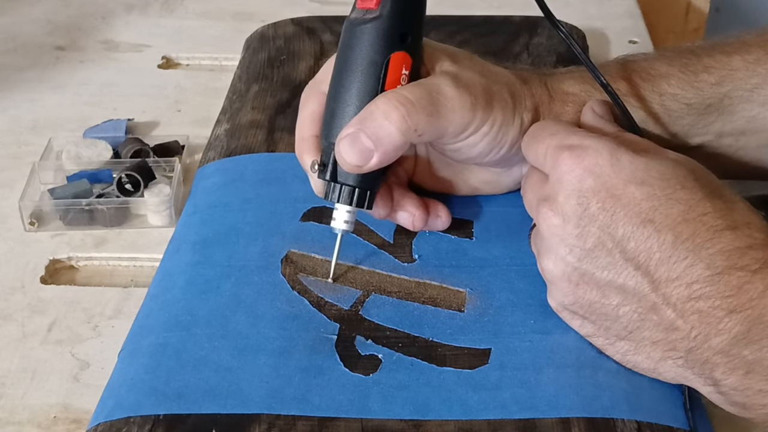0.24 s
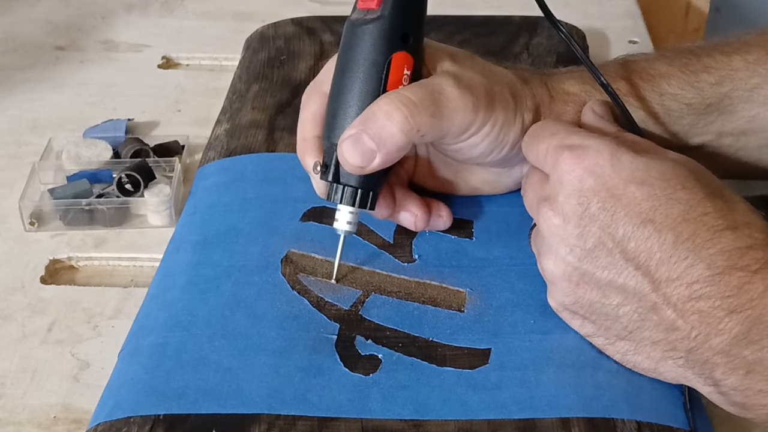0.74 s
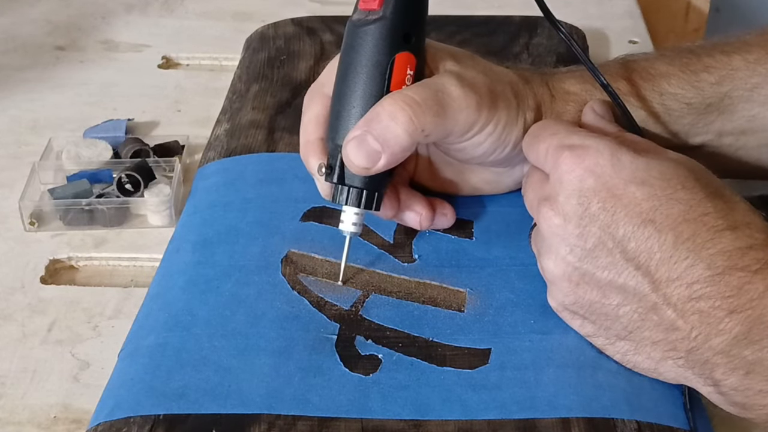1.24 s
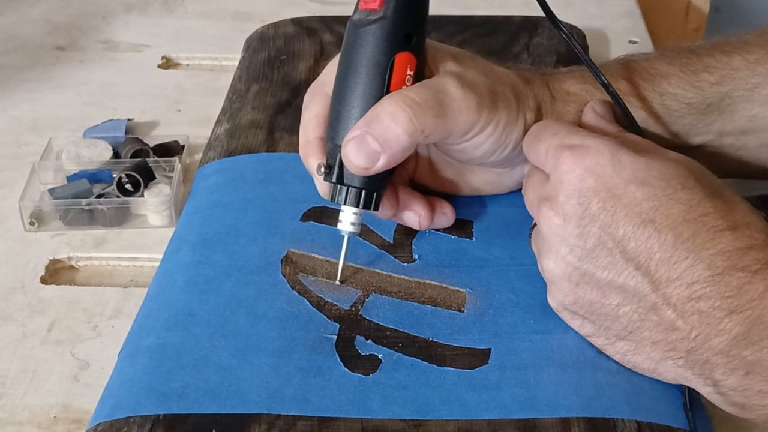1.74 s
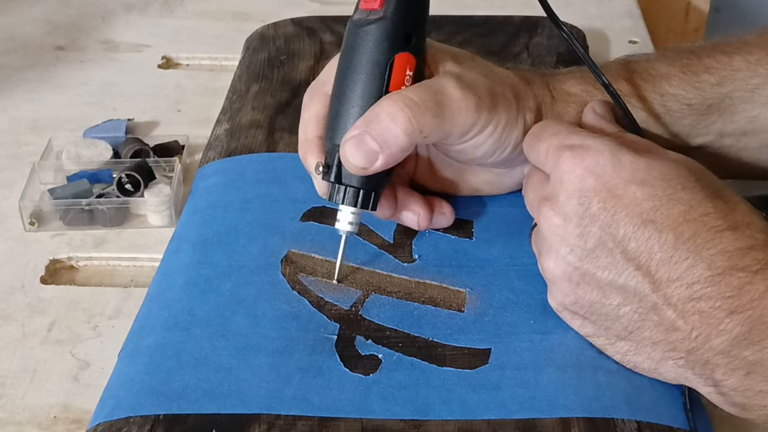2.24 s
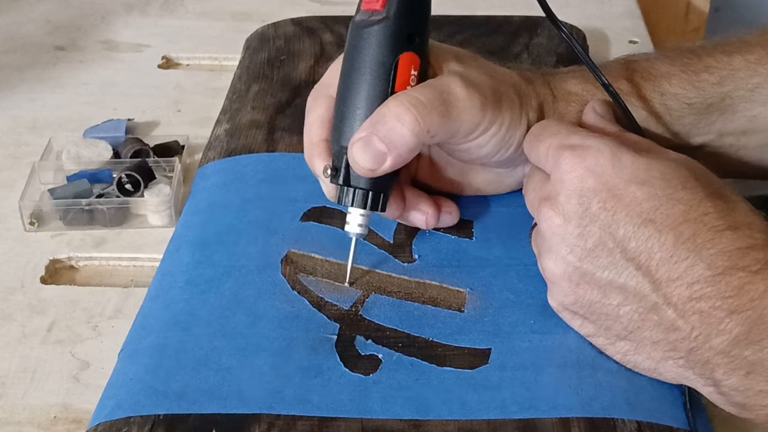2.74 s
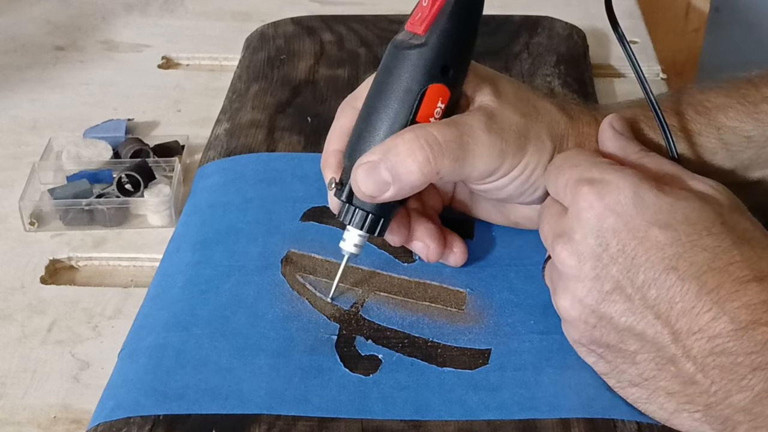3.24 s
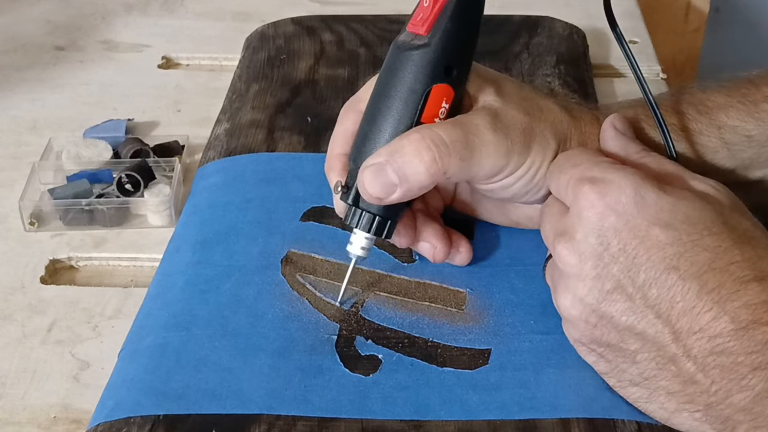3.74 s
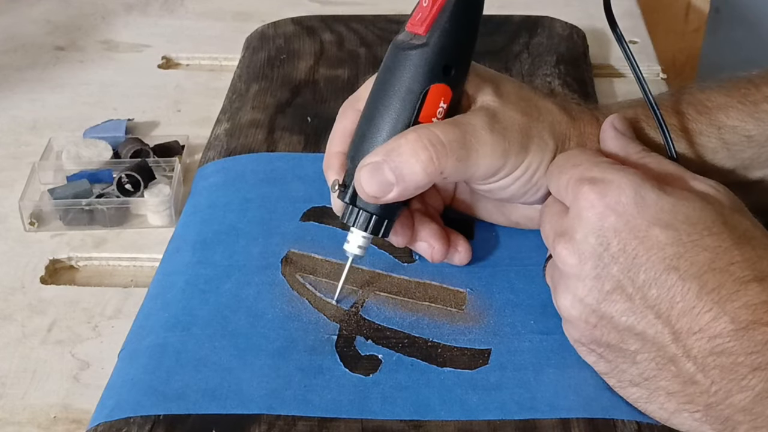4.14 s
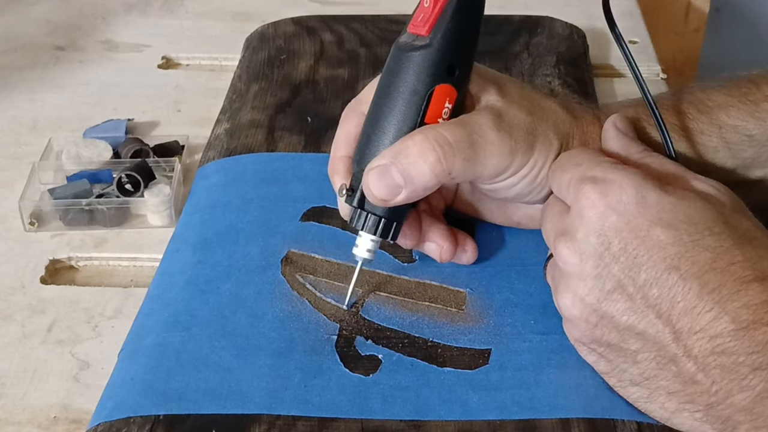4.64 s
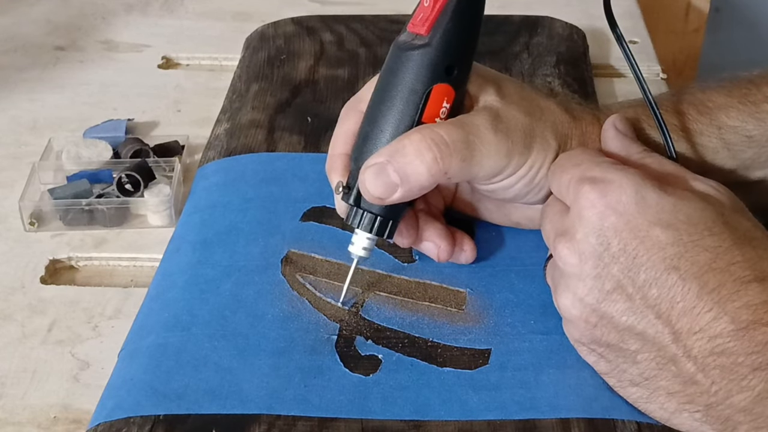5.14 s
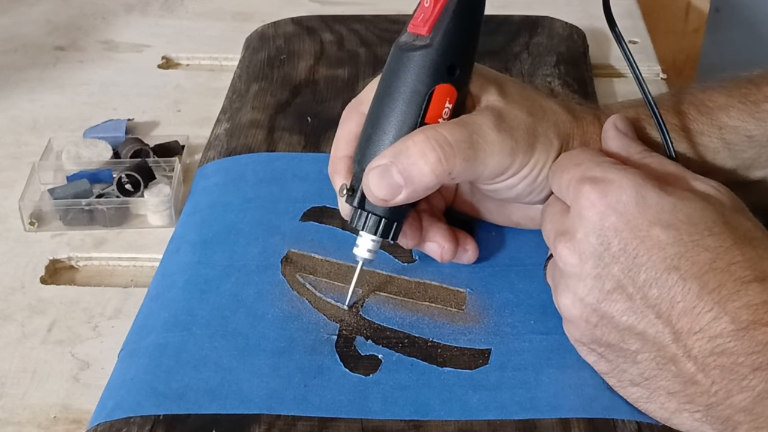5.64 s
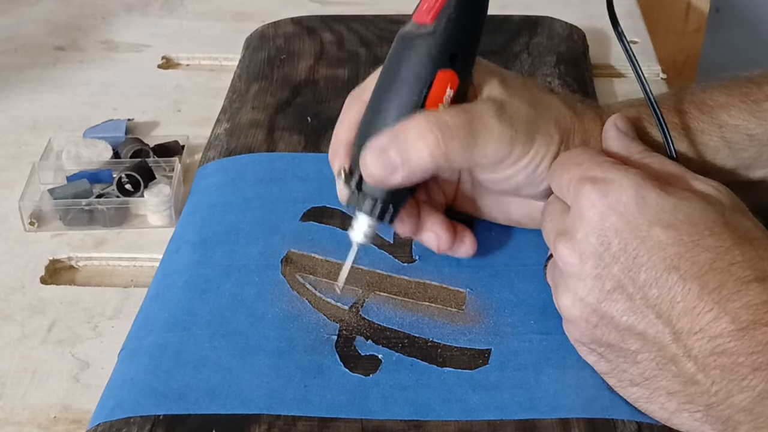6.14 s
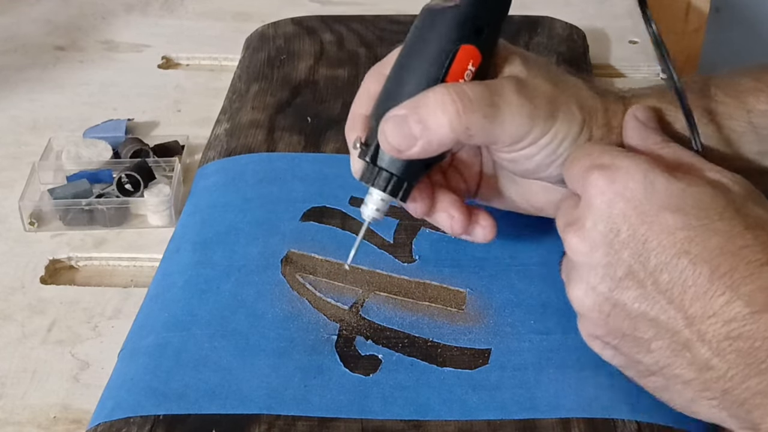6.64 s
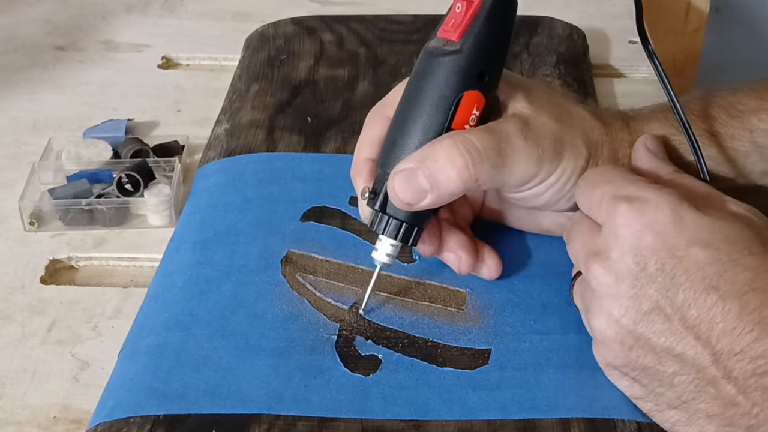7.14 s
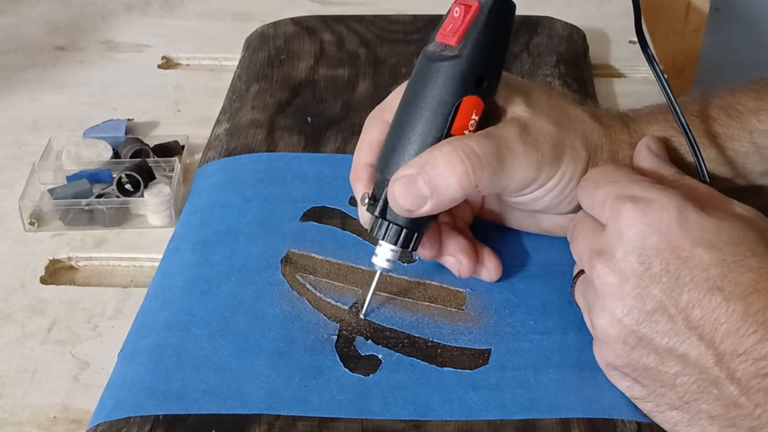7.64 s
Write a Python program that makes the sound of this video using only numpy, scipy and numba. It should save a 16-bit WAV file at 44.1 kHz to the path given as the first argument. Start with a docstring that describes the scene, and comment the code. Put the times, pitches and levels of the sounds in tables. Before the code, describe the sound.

Close, buzzing whine of a handheld rotary tool carving a wooden board with gritty chatter, spinning freely for a moment late on.

```python
"""A small rotary tool whines and rasps as it engraves a wooden board on a workbench, close to a phone.
The motor sings in harmonics (whole multiples of its turning rate) and slows under load. Its cutting tip,
the burr, knocks the board once a turn, throws grit, and now and then skips, hops or catches.
Near the end it is lifted clear for a while. Twice the sound drops out briefly. The workshop rumbles."""
import sys
import numpy as np
from scipy import signal
from scipy.fft import rfft, irfft
from scipy.io import wavfile
from numba import njit

SR = 44100
rng = np.random.default_rng(int(sys.argv[2]) if len(sys.argv) > 2 else 0)


def file_out(sig):
    """Save sig as 16-bit WAV at sys.argv[1]."""
    # one column per channel
    cols = np.atleast_2d(sig).T
    # limit, then scale
    lim = np.clip(cols, -1, 1)
    pcm = np.round(lim * 32767).astype(np.int16)
    wavfile.write(sys.argv[1], SR, pcm)


N = 347949
T = np.arange(N) / SR
FREQS_HZ = np.maximum(np.arange(N // 2 + 1) * SR / N, 1)
BLOCKS = np.minimum(np.arange(N // 128 + 2) * 128, N - 1)  # tone strengths are set every 128 samples
HARMONICS = np.arange(1, 65)[:, None]
FREE_HZ, USUAL_HZ = 245, 240  # shaft turns a second: without load, and typical
UPRIGHT = T < 2.87  # the tool is held upright at first, then leaning
SKIP_EDGE_S = .012  # fade time of a skip or hop

# The tool leaves the wood and comes back: lift_s, clear_s, lower_s, touch_s
LIFT_TIMES = (6.17, 6.22, 7.56, 7.61)


def burr(angle, sag_hz):
    """The burr cuts wood. Returns the strengths of its tones, and its noise of chatter and grit."""
    # How hard the burr bites: time_s, level_db
    bites = [(0.01, -38.5), (0.07, -32.5), (0.15, -39.5), (0.22, -33.5), (0.32, -30.5), (0.46, -40.5),
             (0.49, -36), (0.56, -37.5), (0.62, -33), (0.67, -38.5), (0.74, -30), (0.79, -34.5),
             (0.83, -33.5), (1.09, -33.5), (1.12, -30.5), (1.16, -35.5), (1.26, -33.5), (1.65, -39.5),
             (1.76, -35.5), (1.79, -40), (1.82, -34), (1.86, -39.5), (2.03, -36.5), (2.06, -32.0),
             (2.27, -36.5), (2.33, -35), (2.36, -30.5), (2.44, -39), (2.47, -34.0), (3.05, -32.0),
             (3.11, -36.5), (3.16, -34.5), (3.41, -34), (3.46, -30), (3.56, -35.0), (3.8, -32.0),
             (3.84, -36.5), (3.9, -31.5), (3.99, -36), (4.02, -32.0), (4.32, -34.5), (4.35, -31.5),
             (4.7, -33), (4.72, -36.5), (4.88, -32.0), (4.96, -37.5), (5.01, -29.5), (5.04, -34.5),
             (5.18, -31.5), (5.33, -33), (5.36, -38), (5.46, -33.5), (5.57, -36), (5.67, -29.5),
             (5.72, -34.5), (6.13, -34.0), (6.17, -42.0), (7.65, -39.0), (7.68, -34), (7.76, -31),
             (7.84, -35.5), (7.88, -30)]
    # The burr skips and chatter fills in: start_s, length_s, chatter_db, knock_change_db
    skips = [(0.114, 0.06, -47, 0), (0.353, 0.03, -47, -2), (0.784, 0.055, -47, -3.5),
             (1.338, 0.062, -43, -4.5), (1.717, .07, -43, 0), (1.824, 0.049, -48, 0),
             (2.004, 0.093, -46, 0.5), (2.256, 0.095, -41.5, -5.5), (2.39, 0.075, -42.5, -2.5),
             (2.899, 0.063, -45, 0), (3.079, 0.06, -41.5, -3), (3.289, 0.062, -47, 0),
             (3.939, 0.059, -40, -9), (4.26, 0.036, -40.5, -2.5), (4.954, 0.041, -46, -1),
             (4.995, 0.064, -39, -1.5), (5.34, 0.029, -40, -9), (5.521, 0.082, -46.5, -3),
             (5.599, 0.059, -47, 0), (6.056, 0.061, -44, -3.5), (7.59, 0.071, -43, -3),
             (7.687, 0.116, -43, 0)]
    skipping = np.array([hold(start, length, SKIP_EDGE_S) for start, length, _, _ in skips])
    _, _, chatter_db, knock_change_db = np.transpose(skips)
    bite_db = np.interp(T, *np.transpose(bites))
    extra_bite_db = bite_db + 34  # compared with the usual bite
    # The burr grabs and lets go up to about 30 times a second.
    grab_db = 0.15 * wander(110)[0] + 1.53 * wander(240)[0]
    jolts = catches()
    knock_db = knock(bite_db, extra_bite_db, sag_hz, grab_db, knock_change_db @ skipping, jolts)
    teeth_db, grit_noise = grit(angle, extra_bite_db, sag_hz, grab_db, jolts)
    tones = drifting_tones(np.vstack([knock_db, teeth_db]), drift=0.38, rate_hz=24, spread_rad=.95)
    tones[:, 2:] *= rasp(skipping.sum(axis=0))
    return tones, chatter(angle, bite_db, gain(chatter_db) @ skipping, jolts) + grit_noise


def knock(bite_db, extra_bite_db, sag_hz, grab_db, skip_db, jolts):
    """One knock a turn, as dB of harmonics 1-18: 1 hums, 2-4 boom in the board, 5-10 are the bite."""
    # Tone of the knock for each grip: boom_db (harmonics 2-4), upper_db (harmonics 7-18)
    upright_knock = [-5, 0.65, 0.61], [-10, -8, -11, -15, -21, -19, -18, -33, -18.5, -16.5, -20.5, -24.5]
    leaning_knock = [-6, -3, 0.94], [-8.5, -5, -9, -7.5, -18.5, -19, -17, -19.5, -20, -12, -18.5, -21]
    # Shares of the bite: time_s, sixth_db (harmonic 6), upper_db (7-10 together); harmonic 5 has the rest
    bite_shares = [(0.01, -6.5, -1), (0.2, -1, -7.5), (0.75, -4.0, -5), (0.87, -0.5, -7),
                   (0.96, -11.5, -5.5), (1.13, -3.0, -6), (1.62, -5.5, -5), (1.97, -3.5, -4.5),
                   (2.83, -2.0, -7.5), (2.91, -6.0, -2.5), (3.24, -10, -5.5), (3.32, -6, -3.5),
                   (3.78, -4.5, -3.0), (3.89, -7.5, -6.5), (4.42, -5.5, -2.5), (4.58, -8, -4),
                   (4.86, -3.5, -4.0), (5.06, -9.5, -4), (5.47, -2.5, -4.0), (5.66, -10, -6),
                   (5.74, -4, -4.0), (7.7, -5.5, -5.0), (7.88, -1, -7.5)]
    # The turning of the shaft, felt through the board: time_s, level_db
    hum = [(0, -51), (.36, -44), (.48, -56.5), (1.11, -48.5), (1.18, -52.5), (1.69, -46.5), (1.85, -59),
           (2.05, -53), (2.3, -60), (2.41, -48), (4.11, -54), (5.0, -48), (5.07, -54), (7.7, -52)]
    times, *shares = np.transpose(bite_shares)
    sixth_db, upper_db = (np.interp(T[BLOCKS], times, share) for share in shares)
    upright, sag = UPRIGHT[BLOCKS], sag_hz[BLOCKS]
    boom_db = -49.5 + 4 * ~UPRIGHT + 0.4 * extra_bite_db + 0.73 * sag_hz
    db = np.zeros((18, len(BLOCKS)))  # row 0 is harmonic 1
    db[0] = (np.interp(T, *np.transpose(hum)) + 3.01 + skip_db)[BLOCKS]
    db[1:4] = np.where(upright, np.c_[upright_knock[0]], np.c_[leaning_knock[0]])
    db[1:4] += (boom_db - bite_db)[BLOCKS] - total_db(db[1:4])
    db[4] = 10 * np.log10(np.clip(1 - gain(sixth_db) ** 2 - gain(upper_db) ** 2, .04, 1))
    db[5] = sixth_db
    db[6:] = np.where(upright, np.c_[upright_knock[1]], np.c_[leaning_knock[1]])
    db[6:] += upper_db - total_db(db[6:10])
    # A slower shaft lifts harmonics 11-18 and, with the upright grip, 3 and 4.
    db[10:] += .5 * (sag - 8)
    db[2:4] += np.where(upright, 0.75, -0.02) * (sag - 7)
    flutter_db = 4.5 * np.minimum(wander(220, size=len(BLOCKS))[0], .4)  # the contact comes and goes
    db[0] += flutter_db
    db[1:3] += flutter_db * upright
    # The bite sets the force; catches add to it from harmonic 3 up.
    force = np.hypot(gain(bite_db + skip_db + grab_db + 4), gain(-1.5) * jolts)
    db[2:] += 20 * np.log10(force[BLOCKS])
    db[1] += (bite_db + 0.22 * grab_db)[BLOCKS] + 6.5
    return db


def rasp(skipping):
    """Load roughens the tones: harmonics 5-10 a little, higher ones more, all from 3 up in a skip."""
    number = HARMONICS[2:]
    rate_hz = 80
    real, imag = (wander(rate_hz * N / SR, len(number), len(BLOCKS)) for _ in range(2))
    depth = np.where(number > 10, .06 * number, .3 * (number > 4)) + .75 * skipping[BLOCKS]
    return (1 + depth * (real + 1j * imag)) / np.sqrt(1 + 2 * depth ** 2)


def grit(angle, extra_bite_db, sag_hz, grab_db, jolts):
    """Fine, bright grit: the part the teeth repeat each turn (dB of harmonics 19-64), and loose hiss."""
    # Tone of the grit for each grip: pitch_hz, level_db
    upright_grit = [(1500, -49), (2750, -3), (3800, 0.5), (4400, -6.5), (5200, 1.5), (6500, -5.5),
                    (7800, -1), (9200, -10), (11500, -1), (13000, -10), (15500, -7.5)]
    leaning_grit = [(1500, -60), (2000, -3.5), (2750, -8.5), (3800, -2.5), (4400, -16), (5300, -3),
                    (6100, -7.5), (7300, 0.5), (8900, -10.5), (11000, -7), (13000, -11), (15500, -8)]
    grit_db = -46 + 2.5 * ~UPRIGHT + 0.2 * extra_bite_db + 0.7574 * sag_hz
    grit_db += 5 * (T > LIFT_TIMES[2])  # more grit after the lift
    hz = USUAL_HZ * HARMONICS[18:]
    colour_db = np.where(UPRIGHT[BLOCKS], at_pitch(upright_grit, hz), at_pitch(leaning_grit, hz))
    teeth_db = colour_db + grit_db[BLOCKS] - 11.5
    pulse = strike(angle)
    noise = np.where(UPRIGHT, hiss(upright_grit, pulse ** 0.61), hiss(leaning_grit, pulse ** 0.59))
    return teeth_db, noise * (gain(grit_db + grab_db) + gain(-8.5) * jolts)


def chatter(angle, bite_db, skip_gain, jolts):
    """The burr rattles unevenly on the wood, more so when it skips or catches."""
    # Tone of the chatter: pitch_hz, level_db
    colour = [(40, -60), (150, -20.5), (330, -12), (600, -14), (900, -8), (1200, 1.5), (1500, 1.5),
              (2000, -2.5), (2450, -3.5), (2750, -20), (4000, -21), (5000, -44)]
    loudness = (gain(bite_db - 12) + skip_gain) * gain(1.8 * wander(250))
    return hiss(colour, strike(angle)) * (loudness + gain(-14) * jolts)


def strike(angle):
    """A pulse that peaks once a turn, as the burr hits the wood."""
    return np.exp(0.46 * np.cos(angle))


def catches():
    """The burr catches in the grain: the strength of each jolt rises fast and falls a little slower."""
    # Each catch: start_s, strength_db
    snags = [(0.617, -29), (1.812, -26.5), (2.04, -33), (2.487, -27), (2.989, -27), (3.885, -25.5),
             (3.922, -25.5), (5.004, -28), (5.649, -28), (7.674, -33)]
    rise_s, fall_s = 0.0035, 0.011
    jolts = np.zeros(N)
    for start, db in snags:
        after_peak = T - start - rise_s
        near = np.abs(after_peak) < .08
        fade_s = np.where(after_peak[near] < 0, rise_s, fall_s)
        jolts[near] += gain(db) * np.exp(-np.abs(after_peak[near]) / fade_s)
    return jolts


def hops(angle):
    """The burr bounces and strikes hard only every other turn. Returns a gain for the tones."""
    # Each run of hops: start_s, length_s, depth (0-1)
    bounces = [(1.35, 0.03, 0.74), (2.03, 0.028, 0.46), (4.27, 0.028, 0.5), (5.511, 0.055, 0.72),
               (7.609, 0.033, 0.5)]
    hopping = sum(hold(start, length, SKIP_EDGE_S) * depth for start, length, depth in bounces)
    return 1 + np.cos(angle / 2) * hopping


def motor(touch):
    """The rotor and brushes whine. Returns the strengths of their tones."""
    # Harmonics 1-14 of the free motor: relative_db
    low_harmonics = [-30, -7, -2.5, -11, 1, -0.5, -3.5, -0.5, -1, -3.5, -14.5, -14, -15, -13]
    # Higher ones that stand out: harmonic, relative_db
    high_harmonics = [(15, -7), (16, -6.5), (21, -6), (43, -7.5), (49, -9), (61, -7)]
    # Whistles while the tool is lifted: harmonic, start_s, end_s, level_db
    whistles = [(35, 6.38, 6.75, -53), (55, 6.26, 6.66, -53), (55, 6.72, 7.1, -52), (35, 7.26, 7.6, -52.5),
                (55, 7.1, 7.6, -54)]
    motor_db, other_harmonics_db, loaded_db = -46.5, -10., -12.5
    ripple_hz, ripple_depth = 50, .22
    db = np.full((len(HARMONICS), len(BLOCKS)), other_harmonics_db)
    db[:len(low_harmonics)] = np.c_[low_harmonics]
    for harmonic, relative_db in high_harmonics:
        db[harmonic - 1] = relative_db
    db[10:] += touch[BLOCKS] * (loaded_db - db[10:])  # load evens out and damps the upper harmonics
    tones = drifting_tones(db + motor_db, drift=0.7, rate_hz=12, spread_rad=np.pi)
    tones[:, :10] *= 1 - touch[BLOCKS]  # in the wood the knock takes these over
    # Ripple in the power supply puts side tones around harmonics 4-10.
    ripple_angle = 2 * np.pi * ripple_hz * T[BLOCKS] + wander(40, 7, len(BLOCKS))
    tones[:, 3:10] *= 1 + ripple_depth * np.cos(ripple_angle)
    for harmonic, start, end, level_db in whistles:
        flicker_db = 1.8 * wander(150, size=len(BLOCKS))
        sounding = hold(start, end - start, edge_s=.05)[BLOCKS]
        tones[:, harmonic - 1] += np.sqrt(2) * sounding * gain(level_db + flicker_db)
    return tones


def fan(angle):
    """The cooling fan and the brushes hiss, pulsing a little with each turn."""
    # Tone of the rushing air: pitch_hz, level_db
    colour = [(40, -60), (150, -23), (800, -27), (1100, -10), (1400, -2.5), (1850, -4.5), (2300, -2.5),
              (2750, -12.5), (3300, -11), (3800, -5), (6000, -7), (8000, -0.5), (9100, -11.5),
              (11000, -3.5), (13000, -12), (15500, -7)]
    return hiss(colour, 1 + 0.14 * np.cos(angle)) * gain(-43.6 + wander(60))


def workshop():
    """The room rumbles quietly and swells now and then."""
    # Tone of the rumble: pitch_hz, level_db
    colour = [(20, -48), (38, -15), (60, -6), (75, 2), (97, -2.5), (120, -10), (190, -33), (300, -28.5)]
    # Each swell: start_s, length_s, level_db
    swells = [(.1, .6, -65), (1.053, .6, -65), (1.899, 0.92, -68), (3.35, .3, -68), (6.95, 0.65, -66)]
    swelling = sum(hold(start, length, edge_s=0.19) * gain(db) for start, length, db in swells)
    return hiss(colour, 1) * (gain(-68.5) + swelling)


def dropouts(sound):
    """The whole sound dips twice, for a few hundredths of a second."""
    # Each dip: fade_s, faint_s, return_s, full_s
    dips = [(2.856, 2.87, 2.888, 2.897), (7.799, 7.812, 7.822, 7.834)]
    # How deep each one goes: change_db
    depths = (-39, -26.5)
    for times, db in zip(dips, depths):
        sound = sound * np.interp(T, times, [1, gain(db), gain(db), 1])
    return sound


def microphones(hz, direct, reflections):
    """One source at two microphones: the right mixes in reflections; level and phase differ by pitch."""
    # How alike the two sides are: pitch_hz, share (0-1)
    likeness = [(60, .82), (230, .98), (450, .88), (1500, .82), (3000, .65), (6000, .5), (14000, .3)]
    # How much louder the left is: pitch_hz, difference_db
    left_louder = [(60, 2.5), (110, -4.5), (200, 0), (380, -3), (700, -4.5), (1290, 0), (2380, 3),
                   (4400, -2.5), (8120, 1.5), (15000, 0)]
    # How far the left wave runs ahead: pitch_hz, lead_radians
    left_lead = [(100, 0), (700, .5), (2070, 0.58), (2600, 1.18), (4100, 0.58), (5500, 2.5), (8700, 3.5),
                 (10000, 4.5), (15000, 5)]
    alike = np.clip(at_pitch(likeness, hz), 0, 1)
    tilt = gain(at_pitch(left_louder, hz) / 2) * np.exp(.5j * at_pitch(left_lead, hz))
    right = alike * direct + np.sqrt(1 - alike ** 2) * reflections
    return np.array([direct * tilt, right / tilt])


def drifting_tones(db, drift, rate_hz, spread_rad):
    """Strength and phase of each harmonic as a complex number; grip and wear make them drift."""
    count, blocks = db.shape
    real, imag, echo_real, echo_imag = (wander(rate_hz * N / SR, count, blocks) for _ in range(4))
    start = 1j * np.exp(1j * spread_rad * rng.standard_normal((count, 1)))  # less spread, sharper pulse
    depth = drift * np.minimum(HARMONICS / 8, 1.5) ** 1.4  # the lowest drift least
    direct = start * (1 + depth * (real + 1j * imag)) / np.sqrt(1 + 2 * depth ** 2)
    loose = np.minimum(HARMONICS / 4, 1)
    drifting = loose * (echo_real + 1j * echo_imag) / np.sqrt(2)
    steady = np.sqrt(1 - loose ** 2) * -.6j * start
    return microphones(USUAL_HZ * HARMONICS, direct, drifting + steady) * gain(db)


@njit
def play_tones(turn, tones):
    """Add up the harmonics of the turning shaft; tones (side, harmonic, block) glide between blocks."""
    out = np.zeros((2, len(turn)))
    for i in range(len(turn)):
        block, blend, wave = i // 128, (i % 128) / 128, turn[i]
        for k in range(tones.shape[1]):
            for side in range(2):
                strength = tones[side, k, block] * (1 - blend) + tones[side, k, block + 1] * blend
                out[side, i] += (wave * strength).imag
            wave *= turn[i]  # step up to the next harmonic
    return out


def hiss(colour, pulse):
    """Stereo noise that follows a pulse and a (pitch_hz, level_db) table, at an average (rms) of 1."""
    direct, reflections = rfft(pulse * rng.standard_normal((2, N)))
    noise = irfft(gain(at_pitch(colour, FREQS_HZ)) * microphones(FREQS_HZ, direct, reflections), N)
    return noise / np.sqrt(np.mean(noise ** 2))


def wander(changes, count=1, size=N):
    """Random curves of spread 1 that change course about this many times over the whole sound."""
    knots = rng.standard_normal((count, int(changes) + 3))
    position = np.linspace(0, int(changes), size)
    rows = np.array([np.interp(position, np.arange(len(row)), row) for row in knots])
    return rows / rows.std()


def hold(start_s, length_s, edge_s):
    """Fade from 0 up to 1, stay, and fade back."""
    return np.clip(np.minimum(T - start_s, start_s + length_s - T) / edge_s + .5, 0, 1)


def at_pitch(table, hz):
    """Read a (pitch_hz, value) table, with all octaves equally wide."""
    pitches, values = np.transpose(table)
    return np.interp(np.log(hz), np.log(np.maximum(pitches, 1)), values)


def gain(db):
    """Turn decibels into a multiplier."""
    return 10 ** (np.asarray(db) / 20)


def total_db(rows_db):
    """The level of several tones together."""
    return 10 * np.log10(np.sum(gain(rows_db) ** 2, axis=0))


def scene():
    """One turning shaft drives the motor and burr sounds; load makes it run unevenly."""
    # Speed of the shaft: time_s, turn_rate_hz
    shaft = [(0, 239.4), (.72, 240.9), (.81, 235.9), (1.01, 235.4), (1.33, 236.6), (1.62, 240.6),
             (2.05, 238.8), (2.86, 237.5), (2.91, 234.2), (3.1, 240.8), (3.31, 234.3), (3.84, 240),
             (3.9, 236), (4.13, 239), (4.17, 233.6), (4.28, 239.4), (4.59, 233.5), (4.92, 240.7),
             (5.04, 236), (5.16, 236.8), (5.27, 233.6), (5.5, 241.6), (5.68, 237.1), (6.11, 240.7),
             (6.33, 245.2), (7.67, 243.6), (7.74, 236.1), (7.8, 240), (7.835, 243.7), (7.89, 244.5)]
    touch = np.interp(T, LIFT_TIMES, [1, 0, 0, 1])  # 1 in the wood, 0 in the air
    speed_hz = np.interp(T, *np.transpose(shaft))
    uneven_hz = speed_hz * (1 + (.0003 + .004 * touch) * wander(300)[0])
    angle = 2 * np.pi * np.cumsum(uneven_hz) / SR
    motor_tones = motor(touch)
    air = fan(angle)
    burr_tones, scrape = burr(angle, sag_hz=FREE_HZ - speed_hz)
    whine = hops(angle) * play_tones(np.exp(1j * angle), motor_tones + touch[BLOCKS] * burr_tones)
    return dropouts(whine + air + touch * scrape + workshop())


def record(dry):
    """The phone cuts off the highest treble."""
    top_hz = 15480
    return signal.sosfilt(signal.ellip(11, .3, 60, top_hz, fs=SR, output="sos"), dry)


dry = scene()
out = record(dry)
file_out(out)
```